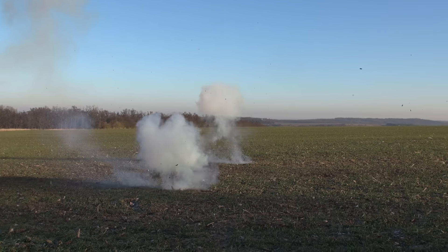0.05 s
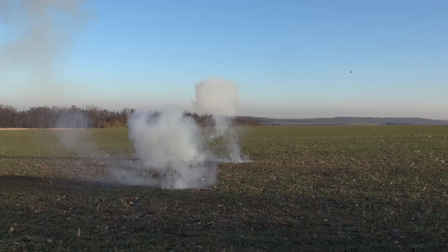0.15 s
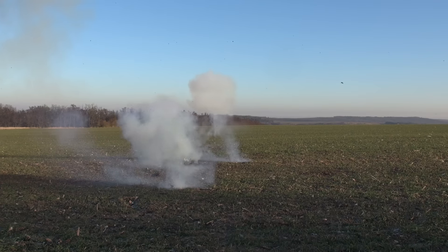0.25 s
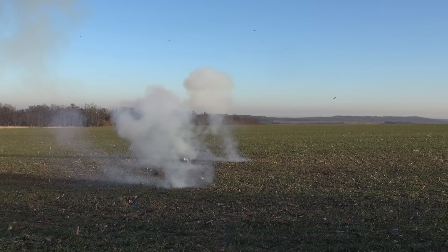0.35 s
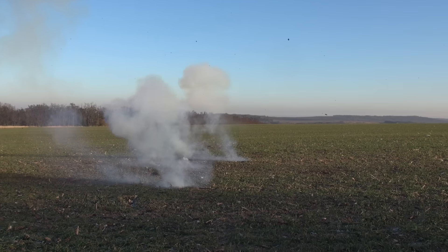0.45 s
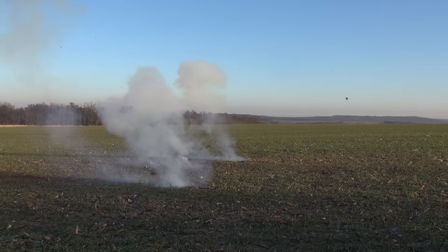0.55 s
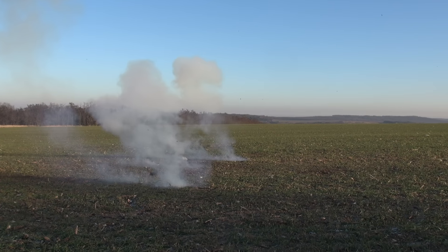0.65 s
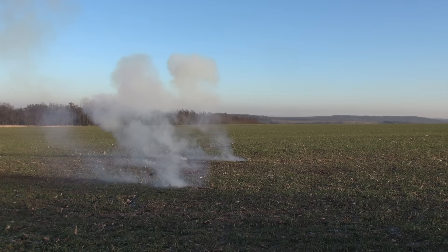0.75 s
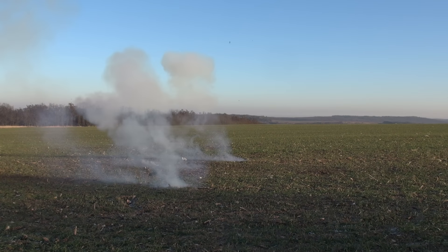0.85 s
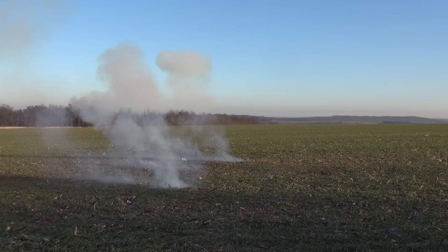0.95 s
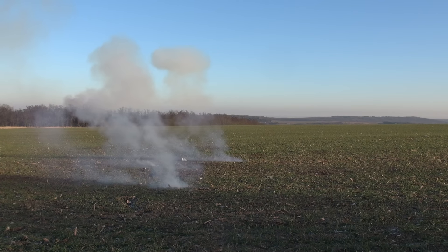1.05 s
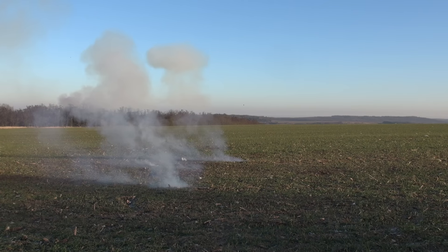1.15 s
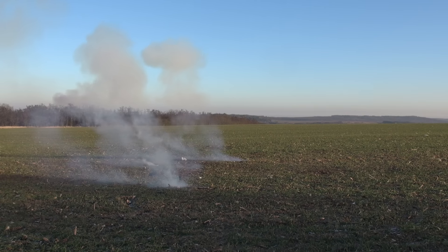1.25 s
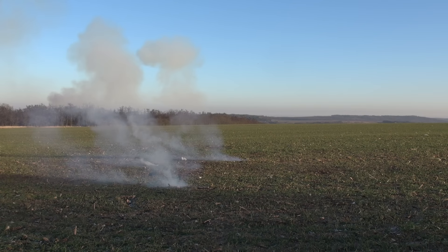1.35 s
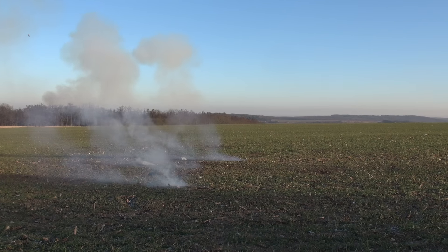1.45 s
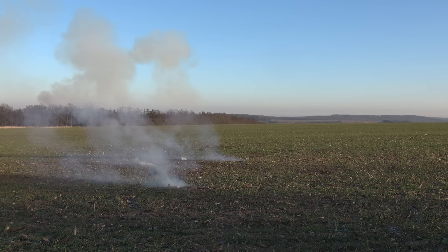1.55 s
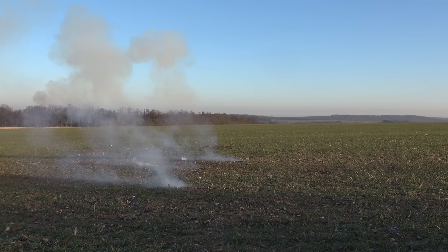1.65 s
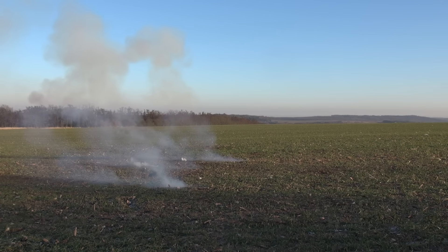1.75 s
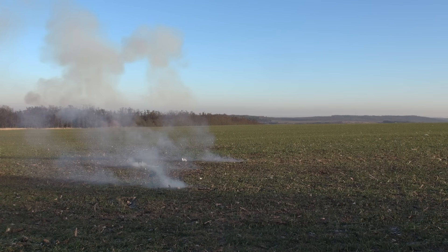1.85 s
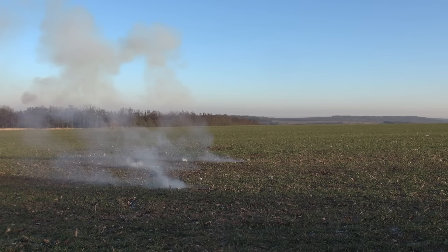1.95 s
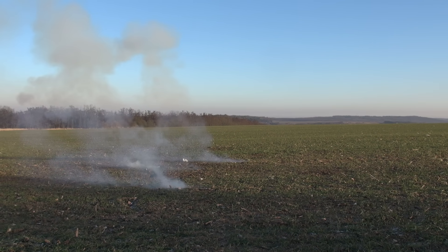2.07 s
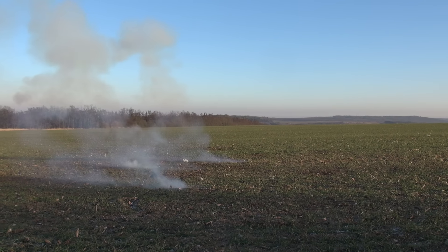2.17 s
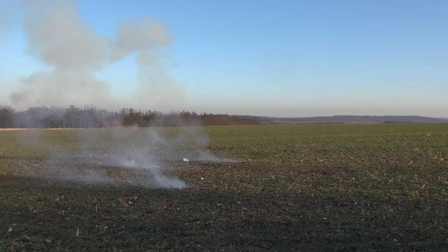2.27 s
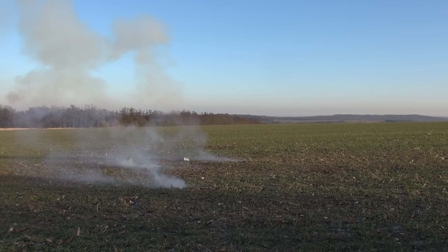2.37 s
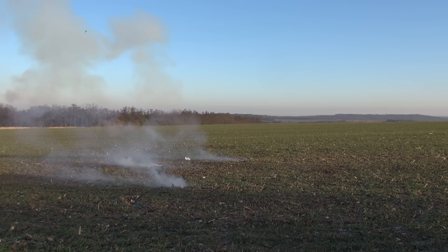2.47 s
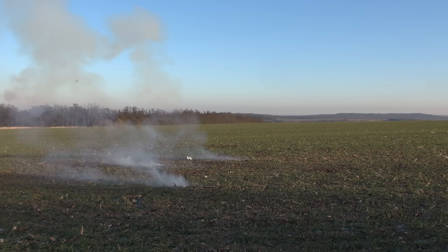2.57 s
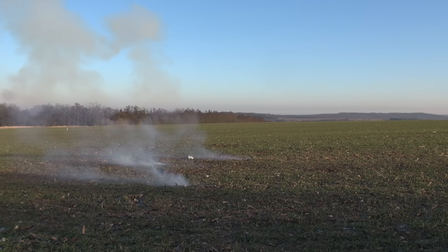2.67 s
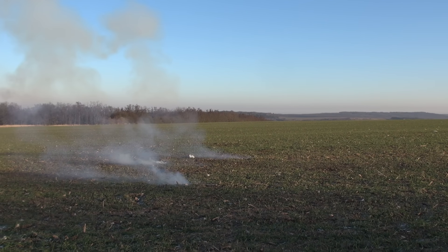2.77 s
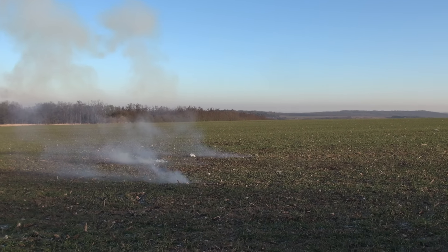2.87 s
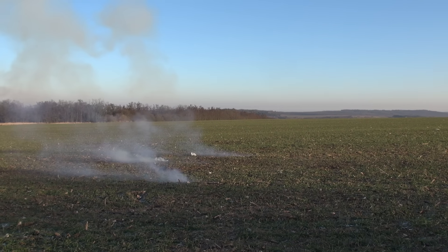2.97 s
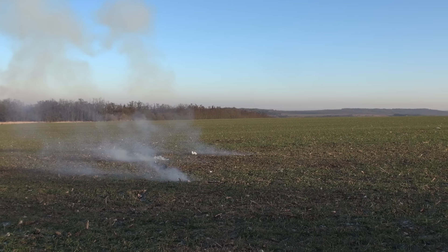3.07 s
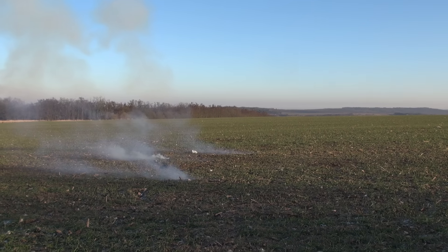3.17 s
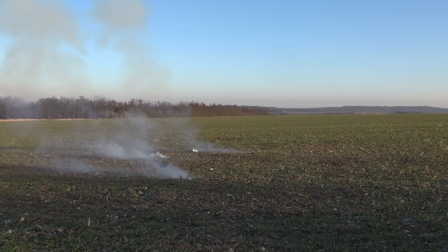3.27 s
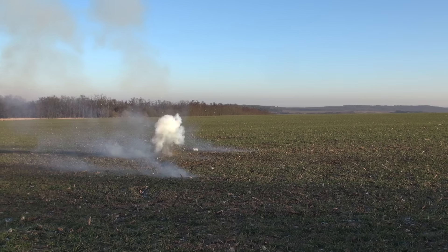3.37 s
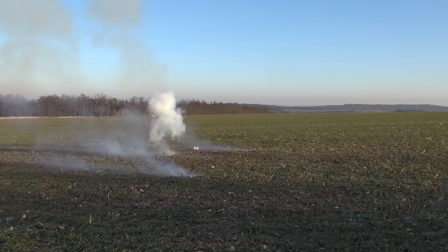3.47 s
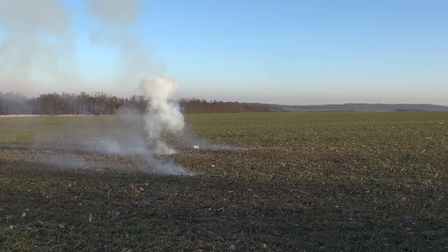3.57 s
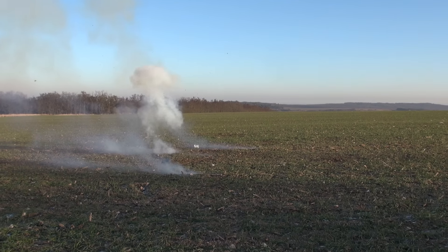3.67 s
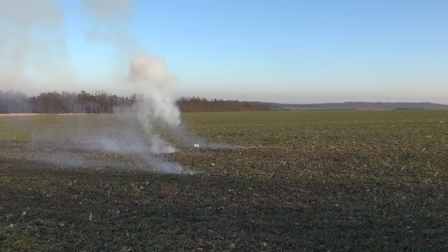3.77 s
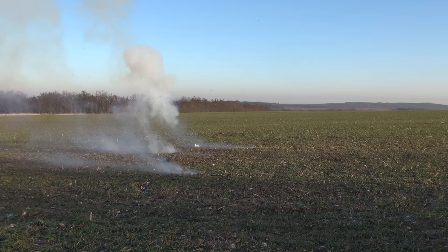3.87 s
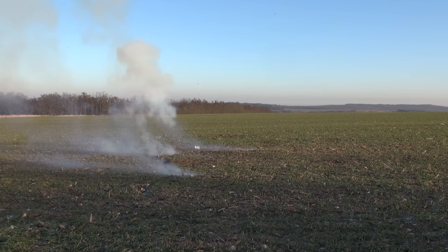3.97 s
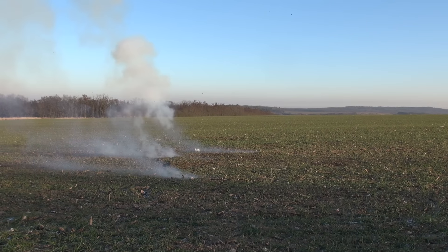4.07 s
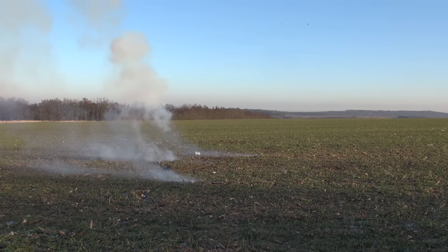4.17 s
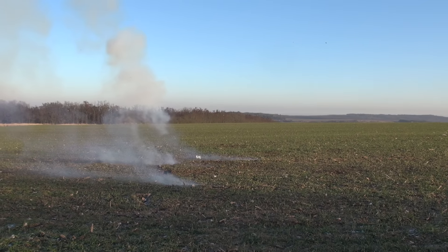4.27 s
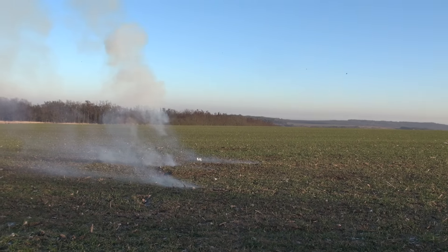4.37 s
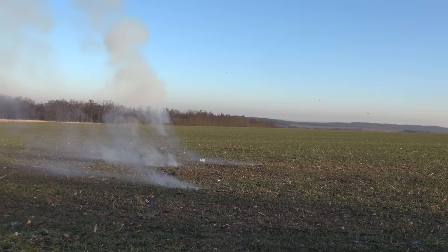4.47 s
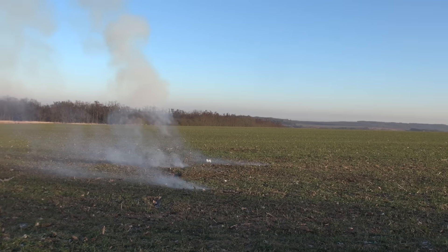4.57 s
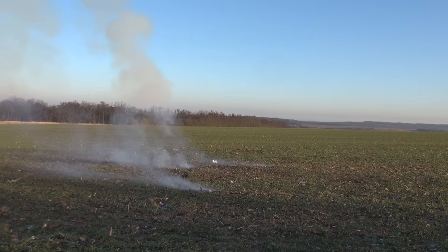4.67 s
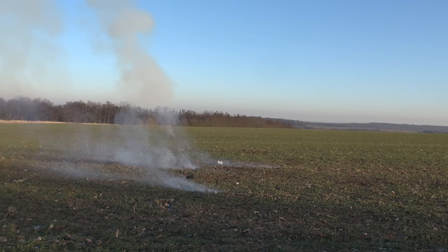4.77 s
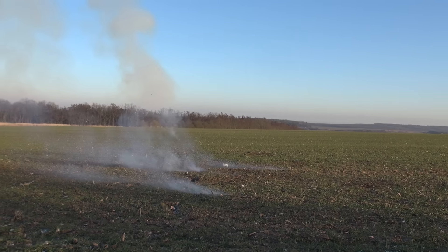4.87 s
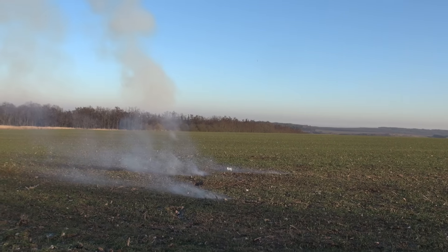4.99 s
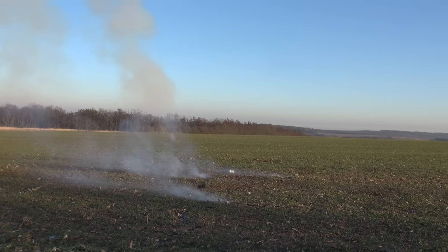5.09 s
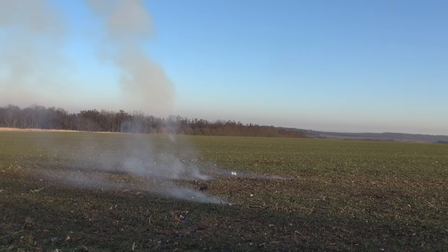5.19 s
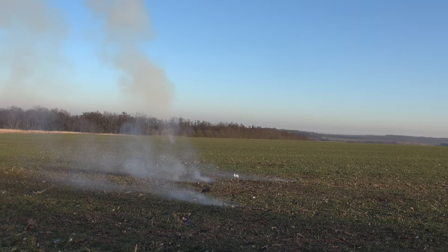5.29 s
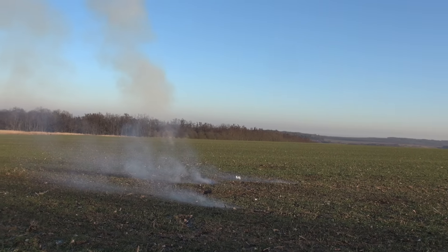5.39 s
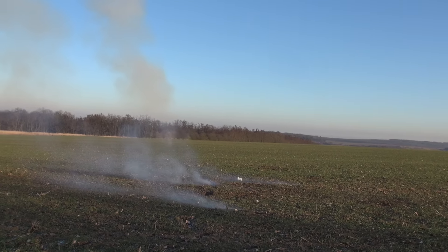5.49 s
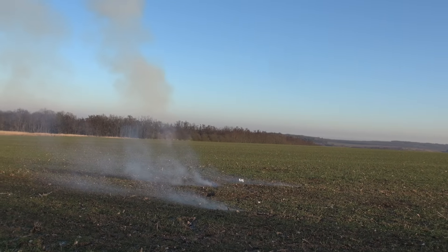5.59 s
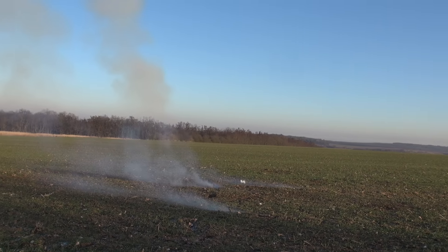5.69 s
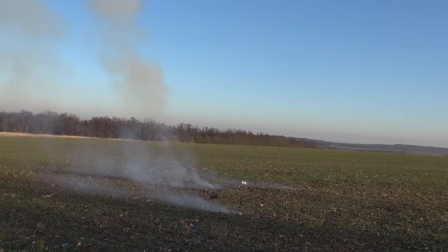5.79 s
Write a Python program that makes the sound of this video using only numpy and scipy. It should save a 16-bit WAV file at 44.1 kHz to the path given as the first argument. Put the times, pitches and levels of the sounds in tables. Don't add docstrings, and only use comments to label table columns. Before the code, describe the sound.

In an open field, the rolling echo of a bang just gone off starts loud and fades into dull rumble. Casing bits click down nearby and stubble rustles. After three seconds a sharp firecracker overloads the small stereo microphone; a tree line answers a third of a second later with a long roar, leaning left. Hiss ducks and creeps back while a fuse sputters on the left.

```python
import sys
import numpy as np
from scipy import signal
from scipy.fft import rfft, irfft
from scipy.io import wavfile
from scipy.ndimage import uniform_filter1d, minimum_filter1d

SR = 44100
rng = np.random.default_rng(int(sys.argv[2]) if len(sys.argv) > 2 else 0)


def inscribe(sig):
    pcm = np.round(np.clip(np.atleast_2d(sig).T, -1, 1) * 32767)
    wavfile.write(sys.argv[1], SR, pcm.astype(np.int16))


def voltage_ratio(level):
    return 10 ** (np.asarray(level, float) / 20)


N = 257544
STEP = 32
TREES_S = 0.318
# start_s, strength_db
BANGS = [
    (-0.7, -2.0),
    (-0.158, 0.2),
    (3.405, 0.3),
]


def rms_one(x):
    return x / np.sqrt(np.mean(x ** 2) + 1e-20)


def in_time(rows):
    s, *columns = np.transpose(rows)
    return [np.interp(np.arange(N) / SR, s, column) for column in columns]


def at_hz(points, hz):
    point_hz, point_db = np.array(points).T
    return np.interp(np.log(hz), np.log(point_hz), point_db)


def drift(rate):
    r = np.exp(-80 * np.pi * rate / SR)
    slow = signal.lfilter([1], [1, -2 * r, r * r], rng.standard_normal(N // 40 + 2002))
    slow = slow[2000:]
    return np.interp(np.arange(N) / 40, np.arange(len(slow)), rms_one(slow))


def band_pass(x, order, low_hz, high_hz):
    return signal.sosfilt(signal.butter(order, [low_hz, high_hz], "band", fs=SR, output="sos"), x)


def resonate(x, modes):
    out = 0
    for k, (hz, width_hz, db) in enumerate(modes):
        r = np.exp(-np.pi * width_hz / SR)
        a = [1, -2 * r * np.cos(2 * np.pi * hz / SR), r * r]
        b = [(1 - r * r) / 2, 0, (r * r - 1) / 2]
        out = out + (-1) ** k * voltage_ratio(db) * signal.lfilter(b, a, x)
    return out


def opens(age, rise_s):
    return np.log10(1 - np.exp(-(np.maximum(age, 0) / rise_s) ** 2) + 1e-9) * 20


def fine(slow):
    place = np.arange(N) / STEP
    return np.array([np.interp(place, np.arange(len(row)), row) for row in np.atleast_2d(slow)])


def pan(x, db):
    return x * voltage_ratio(np.multiply.outer([.5, -.5], db))


def summed(layers):
    return fine(np.sqrt(sum(pan(voltage_ratio(db), side_db) ** 2 for db, side_db in layers)))


def recorder_gain_db():
    attack_s, release_s = 0.42, 1.0
    age = np.arange(N) / SR - np.array(BANGS)[:, :1]
    duck = voltage_ratio(opens(age, attack_s)) * np.exp(-(age / release_s) ** 2)
    since_s = np.where(age > 0, age, np.inf).min(axis=0)
    rest_db, duck_db, creep_db_per_s = -71.5, 18.5, 0.6
    return rest_db - duck_db * duck.max(axis=0) + creep_db_per_s * since_s


def recorder_noise():
    # pitch_hz, level_db (per Hz)
    hiss_color = [(18, -55.5), (30, -17.5), (91, -18), (247, 0.4), (322, 0.0), (478, -14.5), (606, -18),
                  (1000, -22), (1610, -29.5), (2950, -35.5), (9920, -38.5), (15700, -44.5), (15900, -68)]
    # pitch_hz, level_db
    whine_lines = [(3801, -76), (5701, -77), (7125, -76.5), (7601, -83.5), (14250, -93)]
    # time_s, pitch_hz
    spindle_path = [(0, 10080), (1.3, 10060), (1.4, 10170), (2.6, 10150), (3.14, 9960), (3.17, 10120),
                    (3.22, 9800), (3.4, 9680), (3.9, 9880), (5.84, 10000)]
    gain_db = recorder_gain_db()
    hz = np.maximum(np.fft.rfftfreq(N, 1 / SR), 10)
    mid, side = irfft(rfft(rng.standard_normal((2, N))) * voltage_ratio(at_hz(hiss_color, hz)), N)
    hiss = mid + 0.58 * side * [[1], [-1]]
    top = band_pass(mid, 4, 10500, 15500)
    t = np.arange(N) / SR
    lines = sum(voltage_ratio(db + 1.5) * np.sin(2 * np.pi * f * t + 1.2 * drift(9.0)) for f, db in whine_lines)
    turns = np.cumsum(in_time(spindle_path)[0]) / SR
    spindle = voltage_ratio(-75.0) * np.sin(2 * np.pi * turns + 1.5 * drift(25.0))
    motor_gain = voltage_ratio(0.45 * (gain_db + 76.0))
    return voltage_ratio(gain_db) * hiss / np.std(top) + motor_gain * (lines + spindle)


def fuse():
    # time_s, level_db
    burn = [
        (4.3, -100.0),
        (4.47, -76.5),
        (4.65, -65.5),
        (5.0, -65),
        (5.4, -66),
        (5.84, -72),
    ]
    # pitch_hz, width_hz, level_db
    jet_bands = [(7270, 1800, 1.5), (10200, 2100, 0.8), (12700, 2000, -0.8)]
    level = voltage_ratio(in_time(burn)[0] + 7.0 + 1.5 * drift(15.0))
    noise = rng.standard_normal((2, N))
    jet = rms_one(resonate(resonate(noise, jet_bands), jet_bands))
    return level * jet * voltage_ratio(np.array([[4.0], [-6.0]]))


def ticks():
    # start_s, peak_db, ring_db (relative), sizzle_db (relative), left_right_db
    landings = [(0.1481, -28.5, 1, -14, 4), (0.5502, -47.5, 12, -34, 10), (0.634, -47, -6, -30, 2),
                (0.7304, -41, 0, -30, 2), (0.805, -21, -3.5, -16, -3), (0.9268, -50, -3, -5, 4),
                (0.976, -48, -8, -28, 2), (1.077, -41, -4, -19, -8), (1.4035, -43, 3, -27, 3),
                (1.921, -18, -3.5, -14, -4), (2.388, -51.5, 9, -17, -0.5), (2.5025, -19.5, -1.5, -12, 4),
                (2.774, -52, 6, -9, -5), (2.7804, -54, 2, -16, -0.5), (2.938, -48, -0.5, -20, 2),
                (3.259, -48, -1, -14, 1), (3.2674, -50, 5, -19, -4), (3.3254, -51, -1, -21, 1.5),
                (3.392, -16, -4, -16, 2.5), (3.552, -37, -1, -28, 6), (5.3842, -43, -11, -24.5, 6.0),
                (5.461, -36, -4, -18, 5), (5.5343, -36, 0.5, -34, -3), (5.524, -49, -6, -30, 0)]
    # pitch_hz, width_hz, level_db
    crack_modes = [(5470, 3000, -2.0), (7600, 1700, 3.5), (9450, 1500, -7)]
    sizzle_modes = [(12500, 1600, -4.5), (14300, 2200, 7)]
    shell_modes = [(1110, 540, -9), (1780, 430, -0.5), (2510, 530, -0.5), (3210, 500, -0.5),
                   (4300, 700, -11)]
    late_ms = .5
    out, t = np.zeros((2, N)), np.arange(1200) / SR
    grit = rng.standard_normal((len(landings), 2, len(t)))
    snap = (t == 0) * 9.0
    for (s, db, ring_db, sizzle_db, side_db), (sharp, dull) in zip(landings, grit):
        rattle = snap + sharp * voltage_ratio(-60 * t / 0.033)
        knock = snap + dull * 0.77 * voltage_ratio(-60 * np.abs(t - .003) / .03)
        parts = [(resonate(rattle, crack_modes), 8.0),
                 (resonate(rattle, sizzle_modes), sizzle_db + 12.5),
                 (resonate(knock, shell_modes), ring_db + 9.5)]
        hit = sum(voltage_ratio(db + part_db) * part / np.abs(part).max() for part, part_db in parts)
        i = int((s + late_ms / 1000) * SR)
        out[0, i:i + len(t)] += hit * voltage_ratio(side_db / 2)
        out[1, i + 3:i + 3 + len(t)] += hit * voltage_ratio(-side_db / 2)
    return out


def rustles(t):
    # start_s, length_s, level_db, treble_db, left_right_db
    stirs = [(1.96, 0.25, -50, 9, 2), (2.505, 0.155, -43.5, 22, -1.5), (2.652, 0.058, -41, 0, -1.5),
             (2.705, 0.05, -45.5, 5, -1.5), (2.748, 0.044, -36, -5, -2.5), (3.01, 0.15, -54, 18, -3),
             (3.14, 0.11, -54, 23, -5), (3.252, 0.025, -46, 14, -5), (5.31, 0.3, -46, 8, -1.5),
             (5.6, 0.3, -49.5, 8, 1)]
    edge_s = 0.008
    return [(db + opens(t - s, edge_s) + opens(s + length_s - t, edge_s), side_db + 0 * t, treble_db)
            for s, length_s, db, treble_db, side_db in stirs]


def thuds(t):
    # start_s, level_db
    drops = [(1.42, -44.0), (2.752, -36.0), (4.98, -42.0), (5.1, -39.0), (5.33, -44.0)]
    edge_s, t60_s = 0.008, 0.32
    return [(db + opens(t - s, edge_s) - 60 * np.abs(t - s) / t60_s, 0 * t) for s, db in drops]


def echo_levels(t):
    # after_first_answer_s, swell_db, width_s
    clumps = [
        (0.014, 2.5, 0.012),
        (0.062, 2.5, 0.018),
        (0.125, 2.5, 0.025),
        (0.168, -4.0, 0.014),
        (0.5, 1.5, 0.07),
    ]
    first_pan_db, late_pan_db, field_pan_db = -2.5, 5.5, 1.3
    fresh_flank_db, late_flank_db = 3.5, -3.0
    still_s = 3.285
    hedge_lead_s = 0.045
    wind_db = -52.5 + 3.0 * drift(2.5)[::STEP]
    boom, deep, scatter = [], [(wind_db, 0 * t)] + thuds(t), []
    near, flank_db = 0 * t, 0 * t
    trunks_db = 1.3 * drift(45.0)[::STEP]
    for s, db in BANGS:
        age = t - s
        late = np.maximum(age - TREES_S, 0)
        trees = opens(late, 0.01)
        trees = trees + sum(swell_db * np.exp(-((late - at) / width) ** 2) for at, swell_db, width in clumps)
        field = opens(age - 0.018, .004) + opens(TREES_S + .01 - age, .01)
        lull_db = 6.0 * np.exp(-((age - TREES_S) / .012) ** 2)
        still_db = -8.0 * (s < still_s) * voltage_ratio(opens(t - still_s, .02))
        side_db = late_pan_db + (first_pan_db - late_pan_db) * np.exp(-late / 0.18) - 0.15 * late ** 2
        field_side_db = field_pan_db + 0 * t

        tree_boom_db = -13.6 + trees + still_db - 8.6 * late - 0.75 * late ** 2
        boom += [(db + tree_boom_db, side_db), (db - 12.0 + field - lull_db, field_side_db)]

        tree_deep_db = -27.0 + opens(late, 0.015) - 25.0 * late
        deep += [(db + tree_deep_db, 0 * t), (db - 46.0 + field, 0 * t)]

        tree_scatter_db = -20.8 + trees + trunks_db - 10.6 * late - 0.62 * late ** 2
        tree_treble_db = 7.0 - 19.5 * late
        field_scatter_db = -23.0 + field - 80.0 * np.abs(age)
        hedge_db = -31.0 + field + opens(age - TREES_S + hedge_lead_s, hedge_lead_s)
        scatter += [(db + tree_scatter_db, side_db, tree_treble_db),
                    (db + field_scatter_db, field_side_db, -90.0),
                    (db + hedge_db, first_pan_db + 0 * t, 17.0)]

        narrowing_db = late_flank_db + (fresh_flank_db - late_flank_db) * np.exp(-late / 0.3)
        flank_db = np.where(late > 0, narrowing_db, flank_db)
        near = np.maximum(near, voltage_ratio(field) * (1.0 if s > 0 else .6) * (1 - 0.3 * age / TREES_S))
    scatter += rustles(t)
    return boom, deep, scatter, *fine([np.clip(near, 0, 1), flank_db])


def bands():
    edges = 28 * 2 ** (np.arange(29) / 3)
    white = rng.standard_normal((2, 2, N))
    for k, (low, high) in enumerate(zip(edges, edges[1:])):
        mid, side = band_pass(white[k % 2], 2, low, high)
        yield np.sqrt(low * high), mid, side


def echo():
    # pitch_hz, level_db (per Hz)
    deep_color = [(28, -17), (60, -16), (100, -5), (140, 1.5)]
    far_color = [(76, -42), (130, -15), (188, -4), (227, -1), (286, 1.5), (376, -1), (524, -23.5),
                 (560, -42), (730, -68), (1230, -120)]
    near_color = [(76, -51), (130, -22.5), (170, -8.5), (307, -1.5), (483, -2.0), (594, -2.5), (700, 0),
                  (826, -21), (1100, -31.5), (1430, -61), (2420, -120)]
    scatter_color = [(350, -32), (600, 2.5), (813, -0.5), (976, 1.5), (1220, 0), (1490, -3), (1790, -4),
                     (3180, -21.5), (5630, -46.0), (8620, -53.5), (11000, -65.5), (14300, -95.5),
                     (22000, -120)]
    # pitch_hz, likeness (0 to 1)
    likeness = [(60, 0.77), (200, 0.8), (700, 0.66), (2000, 0.84), (5000, .3), (12000, 0.11)]
    booms, deeps, scatters, near, flank_db = echo_levels(np.arange(0, N, STEP) / SR)
    deep = boom = scatter = fresh_power = 0
    together = voltage_ratio(0.6 * drift(11.5))
    for hz, mid, side in bands():
        alike = np.clip(at_hz(likeness, hz), 0, 1)
        both = np.sqrt(1 + alike) * mid + np.sqrt(1 - alike) * side * [[1], [-1]]
        both = both * together * voltage_ratio(0.99 * drift(4.7))
        if hz < 140:
            deep = deep + voltage_ratio(at_hz(deep_color, hz)) * both
        elif hz < 1200:
            far_db = at_hz(far_color, hz) + flank_db * (hz < 230 or hz > 470)
            boom = boom + voltage_ratio((1 - near) * far_db + near * at_hz(near_color, hz)) * both
        if 600 < hz < 13000:
            slope = (hz / 4500) ** 1.29 - .13
            gain = summed([(db + np.clip(treble_db * slope, -45.0, 14.0), side_db)
                           for db, side_db, treble_db in scatters])
            colored = voltage_ratio(at_hz(scatter_color, hz)) * both
            scatter = scatter + gain * colored
            fresh_power = fresh_power + np.mean(colored ** 2)
    rolling = summed(booms) * rms_one(boom) + summed(deeps) * rms_one(deep)
    left, right = rolling + scatter / np.sqrt(fresh_power)
    return np.array([left, np.r_[right[:2], right[:-2]]])


def slaps():
    # start_s, peak_db, pitch_hz
    single_pushes = [(0.168, -2, 330), (0.216, -4, 300), (2.504, -19, 330), (2.754, -21, 275),
                     (2.764, -19, 231), (3.326, -36, 301), (3.514, 4.5, 371), (3.587, -12, 233),
                     (3.61, -5, 299), (3.658, -7, 253), (3.696, -3, 291), (3.703, 2, 312), (3.732, -9, 213)]
    edge_db, opening_step = -16.0, 0.19
    lead = 300
    out, t = np.zeros(N), np.arange(-lead, 600) / SR
    for s, db, hz in single_pushes:
        u = (t - .002) * hz
        push = (1 - 2 * (np.pi * u) ** 2) * np.exp(-(np.pi * u) ** 2)
        edge = voltage_ratio(edge_db) * np.tanh(u * 34.0) * np.exp(-(u * 7.0) ** 2)
        i = int(s * SR) - lead
        out[i:i + len(u)] += voltage_ratio(db - 4.0) * (push + edge)
    out[:40] += opening_step * np.linspace(1, 0, 40) ** 2
    return out


def blast():
    # start_s, swing (full scale), right_lag_ms
    fronts = [(3.4048, .6, 0), (3.4052, -1.5, 0), (3.4057, 2.0, 0), (3.4064, -1.7, 0), (3.4080, 1.4, 0),
              (3.4104, -1.2, .3), (3.4117, 1.5, 0), (3.4124, -1.4, 0), (3.4143, 1.4, 0), (3.4152, -1.3, 0),
              (3.4216, -1.0, .1)]
    push_ms, snap_ms, sag_ms = .2, .04, 1.8
    t, start = np.arange(int(.3 * SR)) / SR, int(3.4 * SR)
    out = np.zeros((2, N))
    window = out[:, start:start + len(t)]
    for s, size, lag_ms in fronts:
        rise_ms = push_ms
        if size < 0 and 3.406 < s < 3.42:
            rise_ms = snap_ms * (1 + 250 * (s - 3.4064))
        delay_s = np.array([[0], [lag_ms / 1000]])
        age_ms = np.maximum(t + start / SR - s - delay_s, 0) * 1000
        window += size * (1 - np.exp(-(age_ms / rise_ms) ** 2)) * np.exp(-age_ms / sag_ms)
    age = t - .0155
    shared, own = rng.standard_normal(len(t)), rng.standard_normal((2, len(t)))
    rough = band_pass(shared + 0.82 * own, 2, 300, 1204)
    roar = rms_one(rough) * np.clip(age / 0.0011, 0, 1) * voltage_ratio(-9.0 - 60 * age / 0.14)
    spray_level = (t > .005) * (voltage_ratio(-27.0 - 60 * t / 0.07) + voltage_ratio(-57.0 - 60 * t / 0.9))
    spray = signal.lfilter([.6], [1, -.35], shared + own) * spray_level
    mids = band_pass(shared[::-1] + .5 * own[:, ::-1], 3, 550, 1400)
    stubble = rms_one(mids) * np.clip(age / 0.015, 0, 1) * voltage_ratio(-20.0 - 60 * age / 0.36)
    window += roar + stubble + spray
    return out


def limit(x, db):
    gain = np.minimum(1, voltage_ratio(db) / (np.abs(x).max(axis=0) + 1e-9))
    return x * uniform_filter1d(minimum_filter1d(gain, size=441), size=441)


def scene():
    reflections = limit(echo() + slaps(), -3.5)
    return reflections + blast() + ticks() + fuse() + recorder_noise()


def band_limit(x):
    return signal.sosfilt(signal.butter(12, 16520, fs=SR, output="sos"), x)


def record(dry):
    thin = signal.sosfilt(signal.butter(2, 64, "high", fs=SR, output="sos"), dry)
    clipped = np.clip(thin, -.97, .97)
    mix = signal.sosfilt(signal.cheby2(10, 50, 16900, fs=SR, output="sos"), clipped)
    return band_limit(mix)


dry = scene()
out = record(dry)
inscribe(out)
```